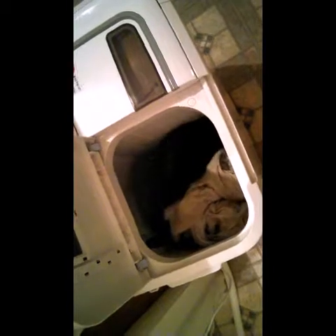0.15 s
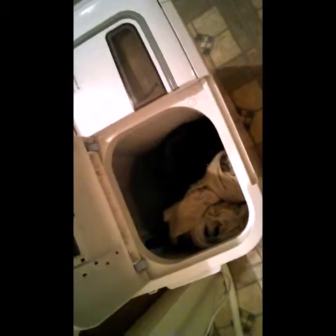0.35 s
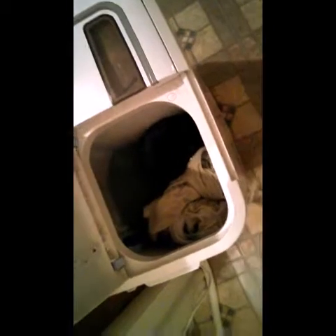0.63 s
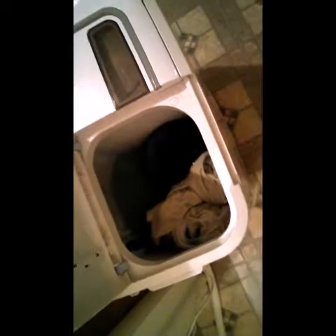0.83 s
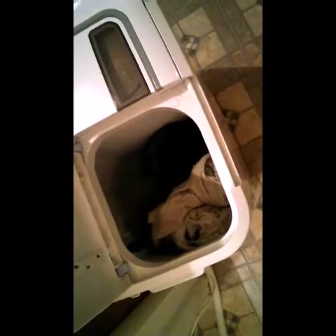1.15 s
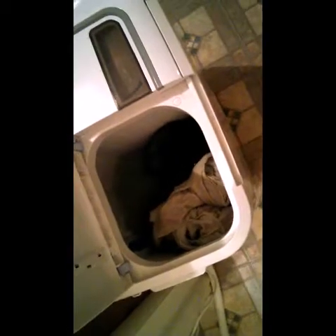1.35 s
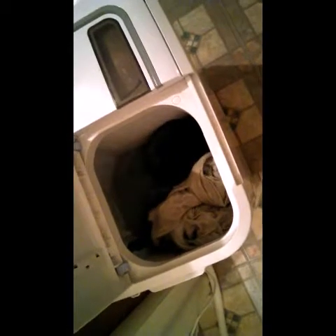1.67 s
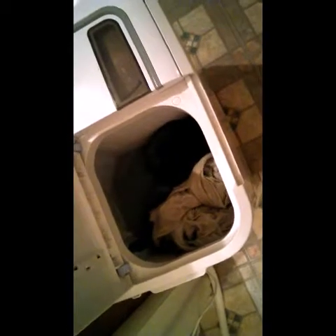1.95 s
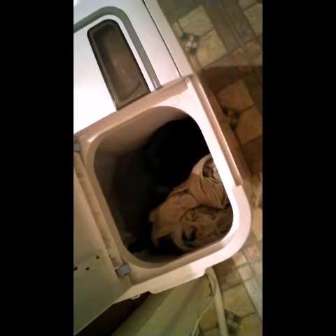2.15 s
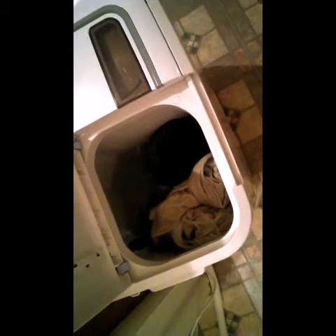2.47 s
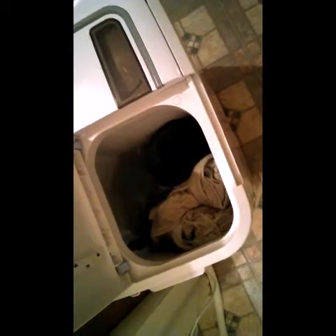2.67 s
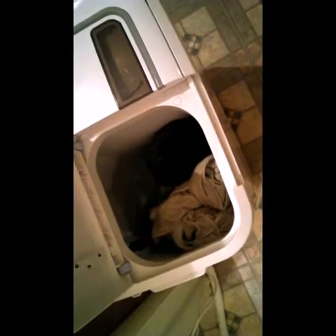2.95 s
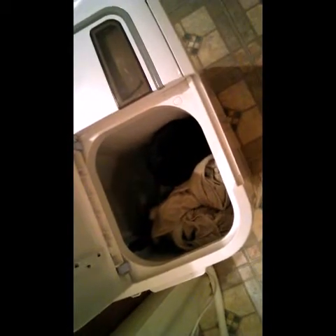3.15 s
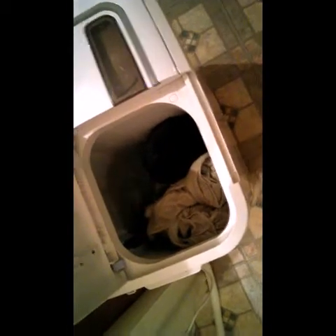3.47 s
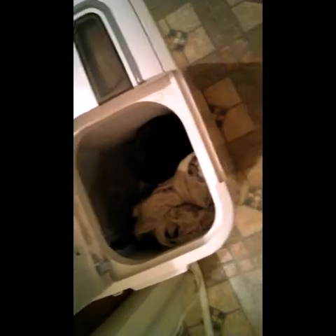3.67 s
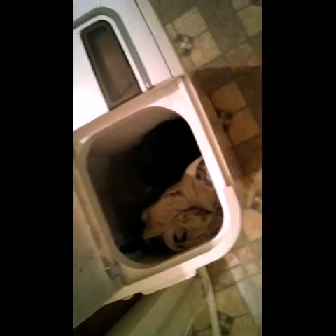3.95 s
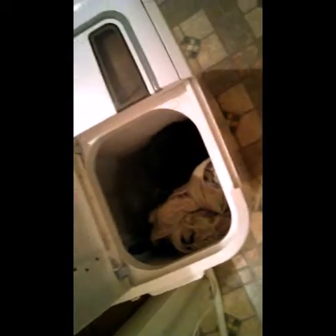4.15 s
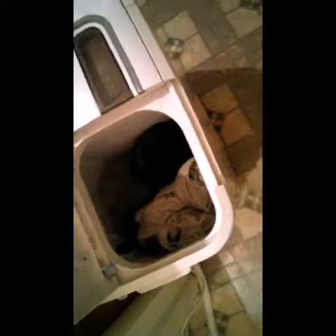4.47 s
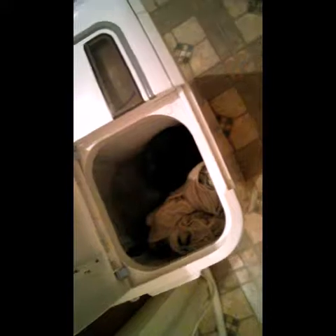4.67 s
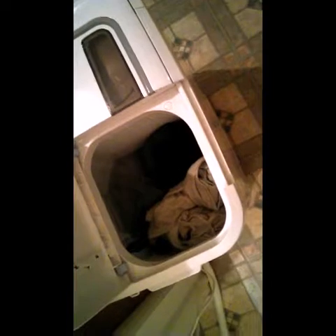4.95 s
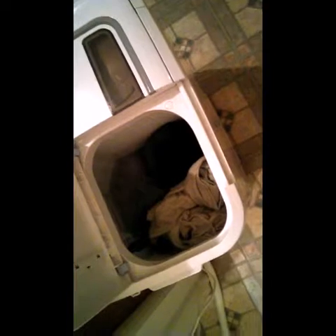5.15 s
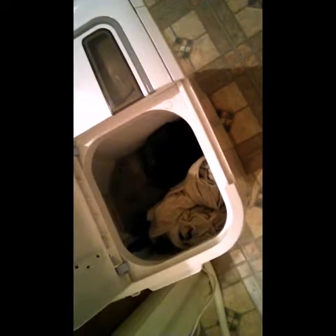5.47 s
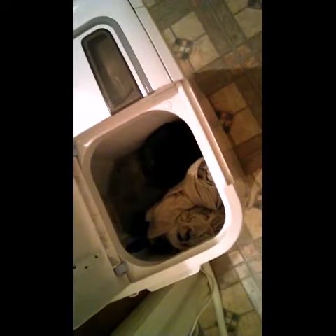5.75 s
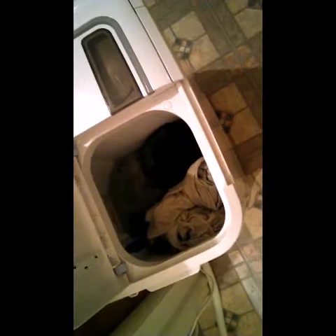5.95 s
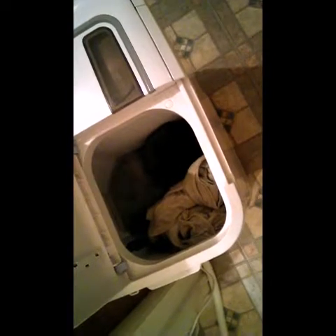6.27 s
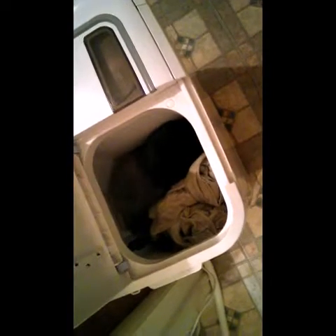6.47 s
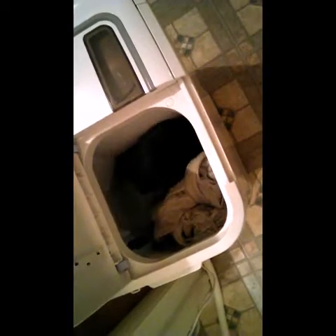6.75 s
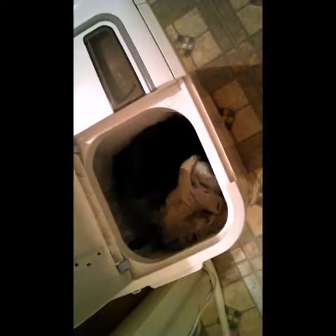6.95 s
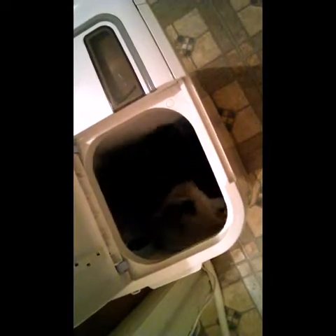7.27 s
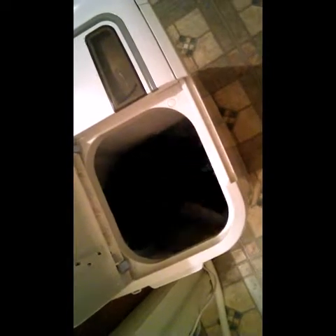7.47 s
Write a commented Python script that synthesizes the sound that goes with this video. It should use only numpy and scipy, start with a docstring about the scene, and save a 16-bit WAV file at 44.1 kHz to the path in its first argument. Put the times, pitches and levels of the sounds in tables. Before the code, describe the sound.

From 0 to 3.2 s a washing machine runs close by: a low, unsteady drone with panels rumbling around 150-200 Hz, a rough whirr and light watery swishing. Short hollow bubble pops come in little clusters at about 0.75, 1.07, 1.4, 1.87 and 2.2 s, leaning left. At 3.15 s a hard metallic clunk with a brief springy ring cuts the motor, which coasts out almost at once. Small wet ticks follow at about 3.5 s. Until 5.95 s there is a quieter pause: a small pump or engine chugs rapidly, about seventeen strokes a second, rattly, over faint hum and room air. At 5.96 s a softer clunk and short squeal restart the drive, which swells over 0.3 s. From 6.85 s water splashes, peaking around 7.15 s with bright slaps and droplets, then bubbles at 7.35 s; the motor still runs at the end, 7.6 s. Hard kitchen surfaces, close stereo.

```python
"""Kitchen washer and chugging pump

A top-loading washer churns, stops with a clunk, rests and starts again in a hard-walled kitchen.
Noise shakes its ringing cabinet panels; shaped noise, bursts and pinging bubbles make the water in the tub.
Somewhere near, a small two-stroke pump or engine, pulsed noise through casing modes, chugs about seventeen
times a second over a steady hum. Two spaced microphones: the right faces the machine, the left hears it
a little later."""
import sys
import numpy as np
from scipy import signal
from scipy.fft import rfft, irfft
from scipy.io import wavfile

SR = 44100
rng = np.random.default_rng(int(sys.argv[2]) if len(sys.argv) > 2 else 0)


def invert_db(level):
    """Linear amplitude ratio for a level in decibels (20 dB per decade), elementwise."""
    return 10 ** (np.asarray(level, dtype=float) / 20)


def wav_out(sig):
    """Save sig, one row per channel (or a flat mono array), as 16-bit PCM at SR to the path in sys.argv[1]."""
    wavfile.write(sys.argv[1], SR, np.round(np.clip(np.atleast_2d(sig).T, -1, 1) * 32767).astype(np.int16))


N = 336042   # samples, 7.62 s
LEFT_LAG_S = 8 / 44100   # about 6 cm more path to the left microphone


def rms_one(x):
    """Scale to unit rms."""
    return x / np.sqrt(np.mean(x ** 2) + 1e-20)


def in_time(rows):
    """Columns of a curve, time first, read at every sample."""
    s, *columns = np.transpose(rows)
    return [np.interp(np.arange(N) / SR, s, c) for c in columns]


def at_hz(points, hz):
    """A spectrum read on a log-frequency axis."""
    point_hz, values = np.array(points).T
    return np.interp(np.log(hz + 1), np.log(point_hz + 1), values)


def drift(rate_hz):
    """Slow chance of spread 1: noise through two equal low-passes at this rate."""
    r = np.exp(-80 * np.pi * rate_hz / SR)   # runs on every 40th sample
    noise = rng.standard_normal(N // 40 + 2002)
    slow = signal.lfilter([1], [1, -2 * r, r * r], noise)[2000:]
    return np.interp(np.arange(N) / 40, np.arange(len(slow)), rms_one(slow))


def colour(x, spectrum):
    """Shape by a spectrum in dB per Hz."""
    return irfft(rfft(x) * invert_db(at_hz(spectrum, np.fft.rfftfreq(N, 1 / SR))), N)


def resonate(x, modes):
    """Parallel resonances of (centre [Hz], width [Hz], level [dB]), signs alternating."""
    out = 0
    for k, (hz, width_hz, db) in enumerate(modes):
        r = np.exp(-np.pi * width_hz / SR)
        gain = (-1) ** k * invert_db(db) * (1 - r * r) / 2
        poles = [1, -2 * r * np.cos(2 * np.pi * hz / SR), r * r]
        out = out + signal.lfilter([gain, 0, -gain], poles, x + 1e-18)
    return out


# how alike the two microphones hear a noise: (frequency [Hz], shared power [0..1])
LIKENESS = [(60, 0.95), (130, 0.99), (290, 0.95), (640, 0.89), (1100, 0.47), (1600, 0.041), (3500, 0.096),
            (6000, 0.008), (15000, 0.01)]


def wide_noise(grit_db):
    """Noise at two spaced microphones: alike in the bass, unrelated in the treble; grit makes it grainy."""
    hz = np.fft.rfftfreq(N, 1 / SR)
    alike = np.clip(at_hz(LIKENESS, hz), 0, 1)
    shared, left, right = rfft(rng.standard_normal((3, N)))
    late = np.exp(-2j * np.pi * hz * LEFT_LAG_S)
    common = np.sqrt(alike) * shared * np.array([late, late ** 0])
    apart = np.sqrt(1 - alike) * np.array([left, right])
    return irfft(common + apart, N) * invert_db(grit_db * drift(164.0))


def sides(pan_db):
    """Left and right gain for a pan, given as left minus right."""
    return invert_db(np.array([[pan_db], [-pan_db]]) / 2)


def add(out, s, burst):
    """Lay a burst in at its moment."""
    i = round(s * SR)
    out[..., i:i + burst.shape[-1]] += burst[..., :N - i]


def ping(hz, t60, rise):
    """A dying sine whose pitch climbs by twice the rise over its t60, as a bubble's does."""
    t = np.arange(round(t60 * SR)) / SR
    tone = np.sin(2 * np.pi * hz * t * (1 + rise * t / t60))
    return tone * invert_db(-60 * t / t60) * np.minimum(t / 0.00027, 1)


# the hum: (time [s], frequency [Hz], level [dB])
HUM = [(0, 58.5, -60), (2.3, 58, -51), (2.9, 59, -43), (3.2, 58.6, -44), (3.4, 58.6, -56.5),
       (4.5, 58.6, -52), (5.9, 58.2, -56), (6.8, 58.4, -53), (7.62, 58.5, -47)]
# faint steady low tones of the chugging and humming machines: (frequency [Hz], level [dB])
MACHINE_TONES = [(86, -71.5), (118.4, -92), (172.3, -73)]
# colour of the room's air: (frequency [Hz], density [dB per Hz])
AIR = [(38, -14), (64, 0), (109, -6), (286, -7), (352, -9), (533, -12), (613, -8), (737, -15), (866, -13),
       (1240, -20.5), (1500, -18.5), (2800, -23), (3010, -21.5), (12000, -34), (14400, -41), (15800, -69)]


def background():
    """A wavering mains-like hum, faint low tones of the machines and the noisy air of the room."""
    hz, hum_db = in_time(HUM)
    t = np.arange(N) / SR
    tones = invert_db(hum_db) * np.sin(2 * np.pi * np.cumsum(hz) / SR)
    for tone_hz, db in MACHINE_TONES:
        level = invert_db(db + 0.61 * drift(5.5))
        tones = tones + level * np.sin(2 * np.pi * tone_hz * t + drift(2.9))
    air = rms_one(colour(wide_noise(grit_db=1.5), AIR))
    return np.sqrt(2) * tones + invert_db(-52.5) * air


def low_swell():
    """One slow swell of a very low tone, near 50 Hz."""
    length_s, hz = .45, 50
    t = np.arange(N) / SR - .42
    swell = np.sin(np.pi * np.clip(t / length_s, 0, 1))
    return np.sqrt(2) * invert_db(-42) * swell * np.sin(2 * np.pi * hz * t)


# loudness of the chugging machine: (time [s], level [dB])
CHUG_LEVEL = [(0, -53.5), (3.2, -52), (4.3, -51), (5.9, -53), (7.62, -47.5)]
# its speed: (time [s], speed [turns per s])
SPEED = [(0, 17.03), (1.4, 16.12), (3, 16.86), (3.3, 16.79), (3.7, 17.18), (4.5, 17.38), (5.3, 17.01),
         (5.7, 15.86), (6.1, 17.22), (6.4, 16.84), (7.62, 16.66)]
# strokes in each turn: (place [turn], low-mode drive [dB], high-mode drive [dB], hold [turns])
STROKES = [(0.95, 5.5, 11.5, 0.17), (.08, 3, 7, 0.087), (.41, -4.5, 9.5, 0.16), (0.56, -4, -8, 0.12)]
# ringing of body and casing: (centre [Hz], width [Hz], level [dB])
CHUG_MODES = [(335, 24, -5), (359, 11, 5), (375, 8.2, 0), (439.5, 9.3, 3), (513, 22, -8.5), (595, 29, 7),
              (631, 22, 5), (692.7, 28, 2.5), (704, 230, -9), (779, 24, 2), (835, 28, 0), (860, 28, 1),
              (906, 24, -2), (980, 81, -8.5), (1064, 46, -5.5), (1143, 34, -9), (1580, 116, -6.5),
              (1840, 23, -4.5), (1960, 45, -8), (2285, 107, -4), (2660, 95, -5.5), (2952, 40, 2),
              (3230, 100, -4.5), (3598, 103, -4), (4034, 86, -8), (4380, 300, -13), (5200, 410, -16),
              (6460, 2500, -23.5)]


def chug():
    """Each stroke is a knock and a short rattle into the casing modes, partly the same on every turn."""
    turns = 0.24 + np.cumsum(in_time(SPEED)[0]) / SR   # begins part-way through a turn
    pattern = wide_noise(grit_db=0)[:, (turns % 1 * 2600).astype(int)]   # returns each turn
    rattle = 0.4 * pattern + wide_noise(grit_db=1.2)
    strengths = rng.standard_normal((len(STROKES), 140))
    low = high = low_knocks = high_knocks = 0
    for (turn, low_db, high_db, hold), chance in zip(STROKES, strengths):
        since = (turns - turn) % 1
        shape = np.minimum(since / .01, 1)
        shape = shape * invert_db(-140 * np.maximum(since - hold, 0))   # hold, then decay
        shape = shape * invert_db(1.2 * chance[(turns - turn + 1).astype(int)])   # each stroke's own strength
        knock = np.roll(np.diff(since, prepend=0) < 0, 30) * shape
        knock = np.array([np.roll(knock, round(LEFT_LAG_S * SR)), knock])
        low_knocks = low_knocks + invert_db(low_db) * knock
        high_knocks = high_knocks + invert_db(high_db) * knock
        low = low + invert_db(low_db) * shape
        high = high + invert_db(high_db) * shape
    low_modes = [m for m in CHUG_MODES if m[0] < 1200]
    high_modes = [m for m in CHUG_MODES if m[0] >= 1200]
    body = rms_one(resonate(rattle * low + invert_db(36) * low_knocks, low_modes))
    casing = rms_one(resonate(rattle * high + invert_db(22) * high_knocks, high_modes))
    return invert_db(in_time(CHUG_LEVEL)[0]) * (body * invert_db(-2.76) + casing * invert_db(-2.0))


# the belt's squeal: (time [s], level [dB])
BELT_LEVEL = [(6.02, -68), (6.045, -44), (6.07, -45), (6.1, -47), (6.125, -60), (6.16, -42), (6.2, -50),
              (6.26, -66)]
# ringing of the drive's frame: (centre [Hz], width [Hz], level [dB])
FRAME_MODES = [(596, 77, -4), (990, 46, -11), (1610, 46, -7), (2020, 78, -15)]


def belt():
    """Stick-slip, as grainy noise, rings the frame while the belt takes up the load."""
    return invert_db(in_time(BELT_LEVEL)[0]) * rms_one(resonate(wide_noise(grit_db=6.0), FRAME_MODES))


# snaps of the drive clutch: (time [s], level before trims [dB], clatter t60 [s])
CLUNKS = [(3.1485, -17, 0.06), (5.957, -28, 0.034)]
# colour of the clatter: (frequency [Hz], density [dB per Hz])
CLATTER = [(200, -4), (400, 3), (700, -7), (1090, -8), (1270, -14), (2310, -4), (2910, -9), (3450, -4),
           (4020, -5.5), (6890, -10.5), (8150, -13.5), (12200, -20), (15800, -37)]
# the clutch spring: (centre [Hz], width [Hz], level [dB])
SPRING_MODES = [(2330, 59, 5), (3600, 170, -27), (6700, 810, 6)]


def clunks():
    """The clutch snaps: about 10 ms of clatter, a dying tail, and its spring ringing on."""
    out = np.zeros((2, N))
    clatter = rms_one(colour(wide_noise(grit_db=2.5), CLATTER))
    t = np.arange(round(.2 * SR)) / SR
    for s, db, t60 in CLUNKS:
        tail = invert_db(-60 * np.maximum(t - .011, 0) / t60) + invert_db(-18.0 - 60 * t / 0.5)
        shape = np.minimum(t / .002, 1) * tail
        hit = clatter[:, round(s * SR):][:, :len(t)]
        spring = rms_one(resonate(hit, SPRING_MODES))
        add(out, s, invert_db(db - 11.0) * shape * hit)
        add(out, s, invert_db(db - 18.5 - 60 * t / 0.12) * spring)
    return out


# water slaps on the tub wall: (time [s], peak before pan [dB], centre [Hz], t60 [s])
SLAPS = [(.551, -43.5, 12400, .03), (.749, -43, 2000, .03), (1.862, -44, 1900, 0.055),
         (2.207, -42, 2200, .03), (3.489, -39, 4650, 0.11), (6.584, -42, 9000, .04),
         (6.850, -36, 5060, 0.05), (6.890, -33, 4500, 0.018), (6.913, -34.5, 4800, 0.056),
         (6.978, -33, 6800, 0.1), (6.99, -26, 9100, 0.023), (7.001, -34, 8500, .04),
         (7.057, -28, 3900, .015), (7.063, -32, 6500, 0.016), (7.072, -30.5, 3520, 0.018),
         (7.081, -35, 3000, .015), (7.114, -33, 7000, .03), (7.136, -25, 3780, 0.033),
         (7.146, -28, 3600, .03), (7.156, -22, 5000, 0.025), (7.172, -31, 3600, .025),
         (7.216, -29, 9600, 0.066), (7.2322, -27.5, 4560, .03), (7.197, -29, 6500, 0.066),
         (7.243, -33.5, 8500, 0.033), (7.316, -33, 3000, 0.012), (7.29, -35, 5000, .04),
         (7.345, -33.5, 2390, 0.037), (7.433, -38, 3460, .03), (7.484, -37, 3930, 0.034),
         (7.556, -32.5, 2500, 0.054)]


def slaps():
    """Water hits the tub wall: a crackling noise burst and a softer wash, different on each side."""
    out = np.zeros((2, N))
    noises = rng.standard_normal((len(SLAPS), 3, 8000))
    t = np.arange(8000) / SR
    for (s, db, hz, t60), noise in zip(SLAPS, noises):
        band = [(hz, 1.15 * hz, 0)]
        crackle = invert_db(5 * np.repeat(noise[2, :200], 40) - 60 * t / t60)   # a new level every 40 samples
        wash = invert_db(-15 - 60 * t / .18)
        shape = (crackle + wash) * np.minimum(t / .0012, 1)
        burst = resonate(resonate(resonate(noise[:2] * shape, band), band), band)
        add(out, s, sides(-5) * invert_db(db) * burst / np.abs(burst).max())
    return out


# runs of burping air pockets: (time [s], level before pan [dB], start pitch [Hz], t60 [s], tick level [dB])
POPS = [(.7368, -26, 1010, 0.011, -44), (0.749, -22, 1250, 0.0061, -38), (0.760, -33, 1700, 0.027, -50),
        (.7727, -36, 1500, .008, -38), (1.064, -23, 1250, 0.0047, -29), (1.0740, -25, 1420, 0.0068, -41),
        (1.0870, -32, 1500, .01, -35), (1.3763, -28.5, 1290, 0.015, -34), (1.388, -28, 1950, 0.012, -34),
        (1.3963, -37, 1850, 0.01, -55), (1.4075, -40, 2050, .012, -42), (1.861, -19, 1050, 0.0087, -37),
        (1.8710, -21.5, 1480, 0.015, -35), (1.881, -27, 1960, 0.026, -39), (1.8943, -43, 2300, .01, -38),
        (2.208, -21, 1380, 0.0066, -34), (2.2192, -29, 1250, .008, -37), (2.2345, -45, 1500, .008, -37),
        (2.4154, -36, 960, 0.022, -52)]
# drops and short bubble pops, some in a close cluster, each with its own pan:
# (time [s], level before pan [dB], start pitch [Hz], left minus right [dB])
DROPS = [(0.461, -36, 6250, -2), (.975, -46, 4110, 0), (2.9228, -35.5, 7000, 2), (3.352, -46, 6600, 2),
         (3.455, -37, 3600, -6), (6.864, -31, 3870, -8), (7.12, -31, 2020, -8), (7.1843, -24.5, 6700, -22),
         (7.287, -31, 3950, -11), (7.300, -37, 4030, -12), (7.343, -21, 1160, 2), (7.346, -23.5, 1010, -6),
         (7.3495, -21, 1340, -1), (7.3530, -34, 1260, 1), (7.355, -36, 3230, -8), (7.3562, -23, 1470, 4),
         (6.812, -42, 2050, -8), (6.899, -38, 3600, -9), (6.939, -39, 3770, -9), (6.966, -40, 4280, -9),
         (7.21, -37, 2620, -12), (7.449, -41, 5000, -8), (7.154, -29, 4730, -8), (7.232, -32, 6500, -5),
         (7.4104, -44, 6400, -17)]
# trapped bubbles: (time [s], level before pan [dB], start pitch [Hz], end pitch [Hz], length [s])
GLIDES = [(7.084, -37, 1460, 1610, .01), (7.138, -42, 2660, 1470, 0.0125),
          (7.158, -31.5, 1294, 3430, 0.0134)]


def water():
    """Bubbles ring as dying sines: ticking pops on the left, drops and pops panned each way, pitch glides."""
    out = np.zeros((2, N))
    for s, db, hz, t60, tick_db in POPS:
        add(out, s, sides(9) * invert_db(db) * ping(hz, t60, rise=.22))
        add(out, s, sides(9) * invert_db(tick_db) * ping(4310, t60=0.0068, rise=0.023))
    for s, db, hz, pan_db in DROPS:
        add(out, s, sides(pan_db) * invert_db(db) * ping(hz, t60=0.014, rise=0.14))
    for s, db, start_hz, end_hz, length_s in GLIDES:
        part = np.arange(round(length_s * SR)) / (length_s * SR)
        hz = start_hz * (end_hz / start_hz) ** part
        tone = np.sin(2 * np.pi * np.cumsum(hz) / SR)
        add(out, s, sides(-5) * invert_db(db) * tone * np.sqrt(np.sin(np.pi * part)))
    return out


def tub(x):
    """The left hears the water a little late; tub and walls add a short, different tail on each side."""
    t = np.arange(round(.2 * SR)) / SR
    tails = rng.standard_normal((2, len(t))) * invert_db(-60 * t / 0.09) * (t > .002)
    tails = tails / np.sqrt(np.sum(tails[0] ** 2))
    wet = signal.fftconvolve(x.mean(axis=0)[None], tails, axes=1)[:, :N]
    direct = np.array([np.roll(x[0], round(LEFT_LAG_S * SR)), x[1]])
    return direct + invert_db(-6) * wet


def droplets(stir_db):
    """More stir means more droplets; each rings a few cycles at one of sixteen pitches."""
    out = np.zeros((2, N))
    per_s = 170 * invert_db(1.5 * stir_db + 4 * drift(9.))
    born = rng.random(N) < per_s / SR
    sizes = born * invert_db(3 * np.minimum(rng.exponential(1, N), 3)) * rng.choice([-1, 1], N)
    dealt = rng.integers(0, 16, N)
    lean = invert_db(2.5 * rng.standard_normal(N))   # chance pan
    for k, hz in enumerate(np.geomspace(1500, 7000, 16)):
        clicks = sizes * (dealt == k) * np.array([1 / lean, lean])
        width_hz = hz / 11
        ring = resonate(resonate(clicks, [(hz, hz, 0)]), [(hz, width_hz, 0)])
        out += ring * SR / (2 * np.pi * width_hz)   # a unit click rings near height one
    return invert_db(-55 + .9 * stir_db) * out


# two runs of the drive: (on [s], off [s])
RUN_TIMES = [(-1, 3.215), (5.96, 9)]
# base levels of each run: (deep panel [dB], upper panel [dB])
RUN_LEVELS = [(-35, -39), (-37.5, -37)]


def drive():
    """Time since the start (s), the stop (dB) and both panel levels along the runs."""
    t = np.arange(N) / SR
    run = (t >= RUN_TIMES[1][0]).astype(int)
    on, off, deep_db, upper_db = np.hstack([RUN_TIMES, RUN_LEVELS])[run].T
    # drops quickly when the drive lets go, then coasts out at 95 dB per s
    stop_db = (t > off) * (-7 * np.clip((t - off) / 0.0078, 0, 1) - 95 * (t - off))
    stop_db = stop_db - 4 * np.clip(1 + (t - off) / .065, 0, 1)   # sags just before it lets go
    return t - on, stop_db, deep_db, upper_db


def spin_up(since, length_s):
    """The shake grows to full strength from 17.5 dB down (dB)."""
    return -17.5 * np.clip(1 - since / length_s, 0, 1)


# how hard the water is thrown about: (time [s], stir [dB])
STIR = [(0, 1.5), (1.5, -1), (3.2, -3), (6.1, -1), (6.75, -0.5), (6.88, 6.5), (7.0, 7.5), (7.07, 9),
        (7.15, 12), (7.25, 10.5), (7.32, 8), (7.62, 5)]
# colours of the moving water: (frequency [Hz], density [dB per Hz])
SWISH = [(590, -17), (1000, -5), (1310, -4.5), (2200, -4), (2750, -9), (3480, -11), (4370, -17.5),
         (5000, -16), (6500, -19.5), (11000, -120)]
SPRAY = [(2500, -3.5), (4000, 1.5), (6000, 1), (8000, 13.5), (10000, 1.5), (11500, -24), (13000, -24),
         (15800, -50)]


def moving_water():
    """Water thrown by the drive swishes and sprays as shaped noise among droplets; it dies away at rest."""
    since, stop_db, _, _ = drive()
    stir_db = in_time(STIR)[0]
    moving_db = 0.61 * spin_up(since, 0.3) + stop_db
    foam = wide_noise(grit_db=-1.0)
    swish = invert_db(-49 + 0.29 * stir_db) * rms_one(colour(foam, SWISH))
    spray = invert_db(-65 + stir_db) * rms_one(colour(foam, SPRAY))
    slosh = invert_db(moving_db + 1.53 * drift(26.0))
    return slosh * (swish + spray) + invert_db(moving_db) * droplets(stir_db)


# how hard the clothes drag: (time [s], load [dB])
LOAD = [(0, 0), (.5, 0.5), (1.0, 0.5), (1.3, -1.5), (1.85, 0), (2.3, 0), (2.7, -0.5), (3.1, 0.5), (6.3, -3),
        (6.5, -4), (6.85, -2), (6.93, -5), (7.02, -1.5), (7.2, -1), (7.45, 3.5), (7.62, 3)]
# cabinet panels and whirr: (centre [Hz], width [Hz], level [dB])
DEEP_PANEL = [(30, 29, -6), (50.5, 13, -1.5), (72.4, 17, -4.5), (101, 58, -6.5), (121.5, 12, -2.5),
              (141.5, 13, -1.5), (152.3, 12.8, 5), (166.7, 15.6, -1.5)]
UPPER_PANEL = [(194.2, 9.9, -4), (204.6, 8.3, 6), (219.9, 26, 2.5), (253, 11.6, 1.5), (283.8, 15.2, -2.5),
               (298, 11.4, -5.5), (320, 9.6, -7), (355.7, 41, -10.5)]
WHIRR_MODES = [(447.7, 23.6, 5), (529, 94, -5), (598, 36, 3), (777, 340, -11), (1024, 164, -7)]
# motor tones: (frequency [Hz], level over the deep panel's setting [dB])
MOTOR_TONES = [(120, -7), (178.5, -5.5)]


def cabinet():
    """Motor shake, as noise, rings the panels and the whirr; motor tones follow the deep panel."""
    since, stop_db, deep_db, upper_db = drive()
    load_db = in_time(LOAD)[0]
    spin_db = spin_up(since, 0.3)
    grip_db = 8.5 * np.exp(-((since - .105) / .035) ** 2)   # whirr and upper panel flare as the belt bites
    throb_db, throb_hz = 2.1, 11.   # each panel swells and sags by chance
    deep_db = deep_db + spin_up(since, 0.39) + stop_db + 0.12 * load_db + throb_db * drift(throb_hz)
    upper_db = upper_db + spin_db + grip_db + stop_db + load_db + throb_db * drift(throb_hz)
    whirr_db = -45.5 + 0.7 * spin_db + grip_db + stop_db + 0.84 * load_db
    t = np.arange(N) / SR
    tones = 0
    for hz, db in MOTOR_TONES:
        level = invert_db(db + 1.0 * drift(0.29))
        tones = tones + level * np.sin(2 * np.pi * hz * t + 0.41 * drift(2.35))
    shake = wide_noise(grit_db=-1)
    # a broad band-pass first, then the panel's own modes
    deep = rms_one(resonate(resonate(shake, [(114.0, 86, 0)]), DEEP_PANEL))
    deep = deep * invert_db(-2.0) + np.sqrt(2) * tones
    upper = rms_one(resonate(resonate(shake, [(266, 430, 0)]), UPPER_PANEL))
    whirr = rms_one(resonate(resonate(shake, [(720, 1570, 0)]), WHIRR_MODES))
    whirr = whirr * invert_db(1.9 * drift(28.0))
    return invert_db(deep_db) * deep + invert_db(upper_db) * upper + invert_db(whirr_db) * whirr


def scene():
    """The room and the chugging machine behind, the washer with its water in front."""
    behind = background() + low_swell() + chug()
    machinery = belt() + clunks() + cabinet()
    wet = slaps() + tub(water()) + moving_water()
    return behind + machinery + wet


def top_cut(x):
    """Nothing passes above the cut-off."""
    return signal.sosfilt(signal.butter(12, 16290, fs=SR, output="sos"), x)


# aim of the microphone pair: (frequency [Hz], left minus right [dB])
FACING = [(60, -3), (110, -2.5), (200, -0.5), (380, -1.5), (700, -0.5), (1290, -3), (2380, -6.5),
          (4400, -4.5), (8120, -3), (15000, 0)]


def record(dry):
    """The right microphone faces the machine and hears more of the upper middle; treble ends near 16 kHz."""
    half_db = at_hz(FACING, np.fft.rfftfreq(N, 1 / SR)) / 2
    pair = irfft(rfft(dry) * invert_db(np.array([half_db, -half_db])), N)
    low_pass = signal.cheby2(10, 60, 16300, fs=SR, output="sos")
    mix = signal.sosfilt(low_pass, pair) + 0.0013   # a small constant offset
    return top_cut(mix)


dry = scene()
out = record(dry)
wav_out(out)
```